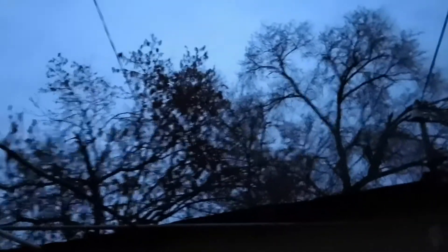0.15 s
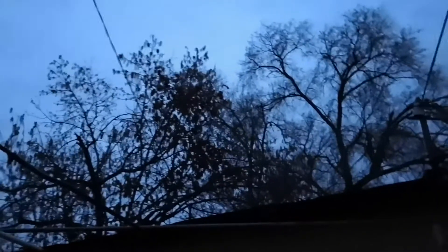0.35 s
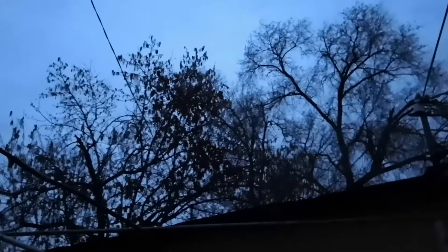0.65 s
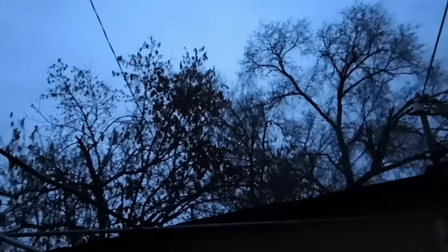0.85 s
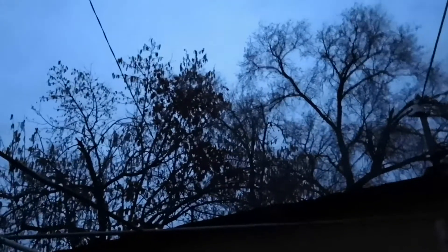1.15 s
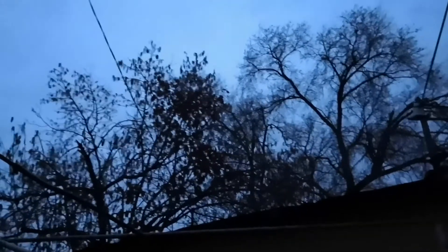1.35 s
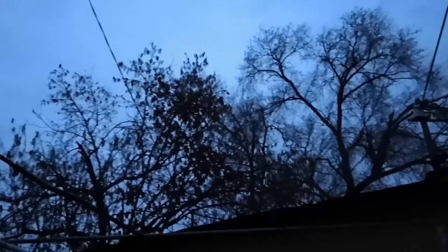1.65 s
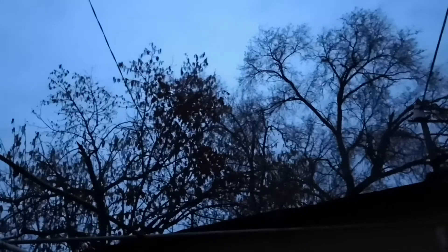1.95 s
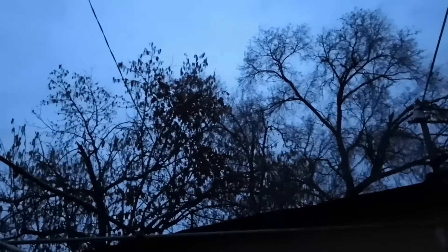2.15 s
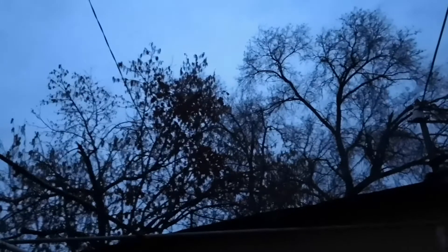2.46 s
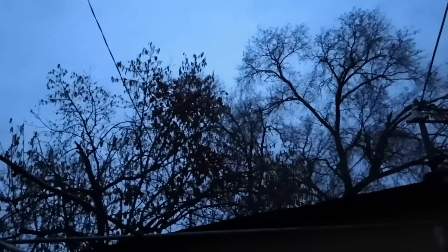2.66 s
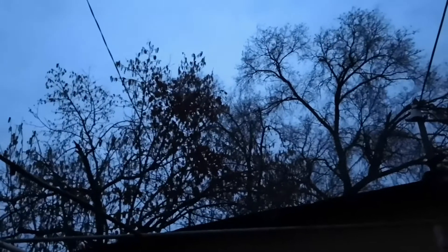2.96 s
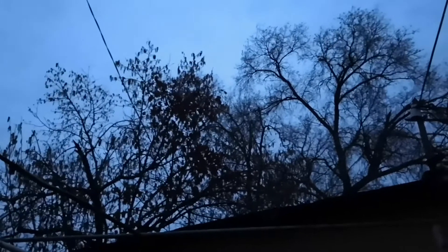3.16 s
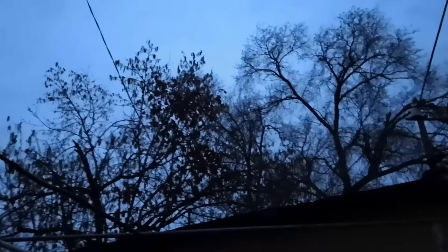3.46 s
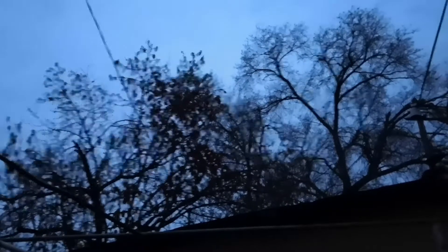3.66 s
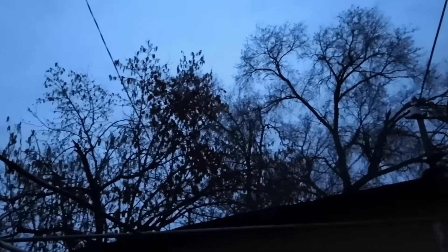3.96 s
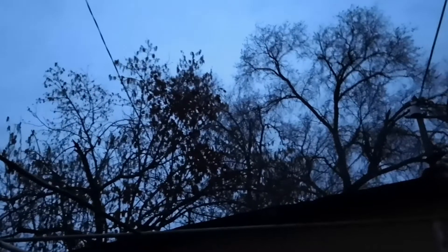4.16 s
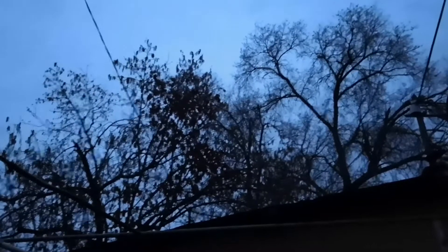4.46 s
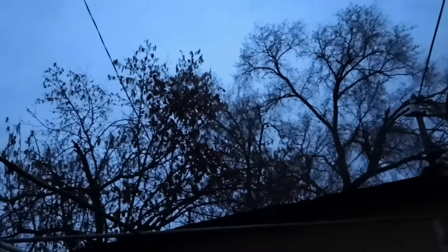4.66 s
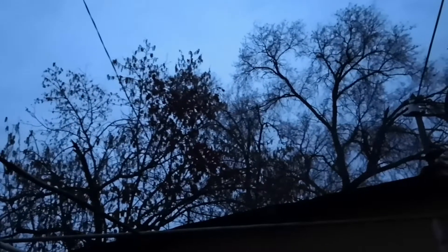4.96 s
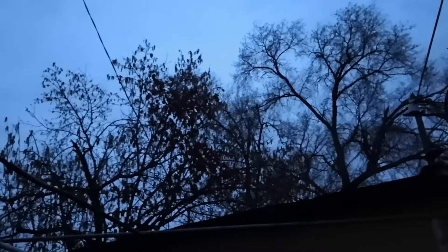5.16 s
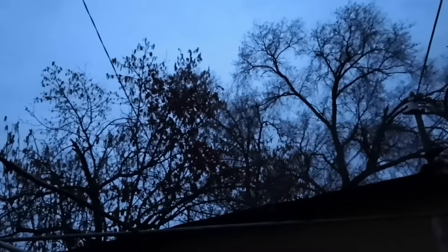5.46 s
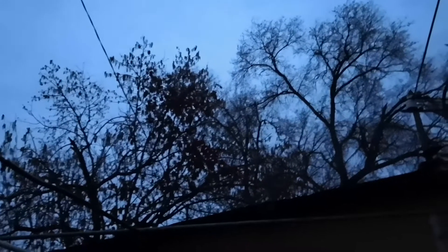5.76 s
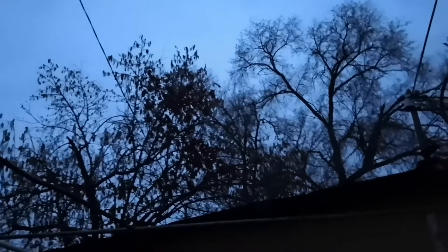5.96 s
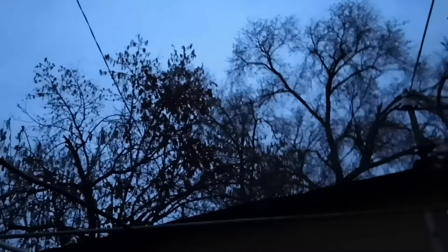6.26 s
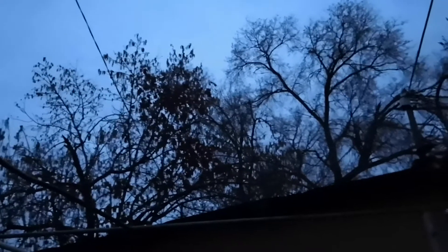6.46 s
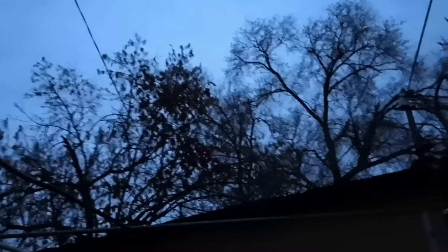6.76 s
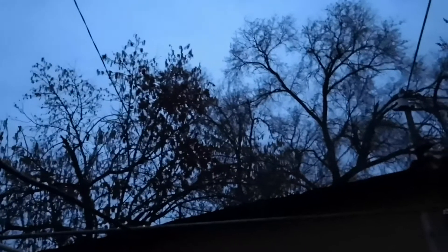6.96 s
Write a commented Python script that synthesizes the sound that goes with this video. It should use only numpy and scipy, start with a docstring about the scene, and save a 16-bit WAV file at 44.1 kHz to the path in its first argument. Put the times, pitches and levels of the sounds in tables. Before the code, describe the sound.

A quiet outdoor scene of about seven seconds, with a low, slightly drifting town hum and faint broadband air. Tiny snap-and-knock ticks recur roughly every 0.6 s. Far birds warble softly at 0.1-0.7 s, then briefly near 3.3, 3.6 and 5.1 s. The blackbird enters at 0.6 s with a falling fluted warble, a short strong whistle at 1.1 s and a higher note at 1.2 s. Thin, high double-toned buzzes follow from 1.5 to 2.4 s. A rising flute glide at 2.7 s leads to reedy squeaks at 3.1 s and a trilled, diving squeal at 3.3 s. After a gap, another rising flute at 4.2 s brings squeaks at 4.6 s and a squeal at 4.8 s. Mellow warbles fill 5.4-5.9 s, louder squeaks come at 6.0-6.2 s, quick flutes at 6.35-6.55 s, then a high see-sawing twitter from 6.7 s to the end. Short diffuse echoes surround the song.

```python
"""Blackbird over a humming town

A blackbird sings fluted, warbling notes, then thin squeaks, squeals, twitters and buzzes: all swept tones.
Most of the song arrives by way of walls and branches, which smear each glide into a short wash of echoes.
Far birds call as softer warbles, and faint ticks pair a noise snap with a hollow knock.
Underneath, shaped noise makes the low hum of the town and its air."""
import sys
import numpy as np
from scipy import signal
from scipy.fft import rfft, irfft
from scipy.io import wavfile
from scipy.ndimage import uniform_filter1d

SR = 44100
rng = np.random.default_rng(int(sys.argv[2]) if len(sys.argv) > 2 else 0)


def log_audio(samples):
    """Write samples as a 16-bit WAV file to the path given in sys.argv[1]."""
    # one column per channel
    frames = np.atleast_2d(samples).T
    # limit to full scale, then quantise
    limited = np.clip(frames, -1, 1)
    pcm = np.round(limited * 32767).astype(np.int16)
    wavfile.write(sys.argv[1], SR, pcm)


N = 313992


def gain_of(db):
    """Decibels to amplitude."""
    return 10 ** (np.asarray(db) / 20)


def evened(x):
    """Scales to rms 1."""
    return x / np.sqrt(np.mean(x ** 2) + 1e-20)


def read(points, hz):
    """Reads a spectrum on a log-frequency axis."""
    f, value = np.transpose(points)
    return np.interp(np.log(hz + 1), np.log(f + 1), value)


def add(mix, s, sound):
    """Mixes a stereo sound in at time s."""
    part = mix[:, max(round(s * SR), 0):][:, :sound.shape[1]]
    part += sound[:, :part.shape[1]]


def wander(length, size):
    """Smooth chance of rms about 1 that changes over about size samples."""
    noise = rng.standard_normal(length + SR)
    return evened(uniform_filter1d(uniform_filter1d(noise, size), size))[:length]


# the town at the two ears: (frequency [Hz], left-right likeness [0 to 1], lead of the left ear [radians])
EAR_LIKENESS = [(30, .998, 0), (100, .985, .03), (250, .85, .35), (430, .55, 1.6), (690, .8, 2.7),
                (1000, .4, 2.1), (1300, .65, .5), (1800, .45, -1.9), (2500, .3, -2), (3200, .5, .6),
                (4000, .35, 3), (10000, .1, 3)]
# side the town leans to: (frequency [Hz], left minus right [dB])
TOWN_SIDE = [(280, 0), (700, 5), (1000, 2.5), (1350, -2.5), (1900, 1), (3000, 0)]


def town(spectrum, patchy_db):
    """Distant noise of rms 1 in drifting patches, alike in both ears mainly in the bass."""
    hz = np.fft.rfftfreq(4096, 1 / SR)
    a, b, c, d, patches = rng.standard_normal((5, N // 1024 + 5, len(hz)))
    # smooth the patches over time, then over pitch
    patches = uniform_filter1d(patches, size=12, axis=0)
    patches = evened(uniform_filter1d(patches, size=3, axis=1))

    at, likeness, lead = np.transpose(EAR_LIKENESS)
    same = np.interp(hz, at, likeness)
    left = a + 1j * b
    shared = left * np.exp(-1j * np.interp(hz, at, lead))
    right = same * shared + np.sqrt(1 - same ** 2) * (c + 1j * d)

    side = gain_of(read(TOWN_SIDE, hz) / 2)
    frames = np.array([left * side, right / side])
    frames *= gain_of(read(spectrum, hz) + patchy_db * patches)
    noise = signal.istft(frames.transpose(0, 2, 1), nperseg=4096, noverlap=3072)[1]
    return evened(noise[:, :N])


# tone of the hum: (frequency [Hz], relative density [dB per Hz])
HUM_SPECTRUM = [(20, -2), (37, -11), (65, -0.5), (113, -1), (140, -4.5), (168, -5), (233, -5.5), (330, -16),
                (380, -10.5), (460, -19.5), (680, -33.5), (1100, -100)]
# slow level changes of the low hum: (time [s], level change [dB])
HUM_LEVEL = [(0, 0), (2.4, -1), (4.1, -1), (4.45, 1), (5.8, 1), (7.12, -.5)]


def town_hum(level_db=-58):
    """Low noise whose level drifts slowly."""
    s, change_db = np.transpose(HUM_LEVEL)
    drift_db = np.interp(np.arange(N) / SR, s, change_db)
    return gain_of(level_db + drift_db) * town(HUM_SPECTRUM, patchy_db=2.5)


# tone of the air: (frequency [Hz], relative density [dB per Hz])
AIR_SPECTRUM = [(300, -46), (520, -14.5), (700, 1), (1050, -5.5), (1300, -5.5), (1480, -7.5), (1850, 1),
                (2500, -4.5), (2800, -5), (4500, -19), (5400, -14.5), (7200, -19.5), (10000, -26.5),
                (15500, -30.5)]


def town_air(level_db=-57):
    """Steady broadband noise above the hum."""
    return gain_of(level_db) * town(AIR_SPECTRUM, patchy_db=3.0)


# faint ticks: (time [s], snap level before its trim [dB], knock level [dB])
TICK_HITS = [(0.1588, -52, -54), (0.7826, -47.5, -52.5), (1.444, -48, -51.5), (1.994, -50.5, -54.5),
             (2.625, -52.5, -52.5), (3.2354, -48, -53), (3.8218, -55.5, -51), (4.446, -53, -54.5),
             (5.0296, -55, -52.5), (5.636, -52, -50), (6.2303, -56, -60)]


def ticks(snap_trim_db=-9, snap_t60=0.083, knock_hz=1550, knock_t60=0.22):
    """Each tick is a brief bright snap over a hollow knock, both of decaying filtered noise."""
    out, t = np.zeros((2, N)), np.arange(SR // 6) / SR
    bright = signal.butter(4, [2000, 9800], "bandpass", fs=SR, output="sos")
    hollow = signal.butter(2, [knock_hz / 1.24, knock_hz * 1.53], "bandpass", fs=SR, output="sos")
    for s, snap_db, knock_db in TICK_HITS:
        snap = evened(signal.sosfilt(bright, rng.standard_normal((2, len(t)))))
        knock = evened(signal.sosfilt(hollow, rng.standard_normal((2, len(t)))))
        tick = snap * gain_of(snap_db + snap_trim_db - 60 * t / snap_t60)
        tick += knock * gain_of(knock_db - 60 * t / knock_t60)
        add(out, s, tick * (1 - np.exp(-t / 0.00024)))  # soften the very first edge
    return out


# direct sound, then distinct echoes from walls: (delay [s], level re the note [dB])
WALL_ECHOES = [(0, -11.5), (.038, -16.5), (.069, -13.5)]
# scatter from branches and roofs: (delay [s], relative level [dB])
SCATTER_SHAPE = [(0, 1), (.03, -5.5), (.07, -1.5), (.095, -9.5), (.15, -15), (.3, -33.5), (.8, -56)]


def garden(note, scatter_db, ahead=0.0733, lead_ms=.36, leaves_hz=6200, leaves_t60=1.0):
    """A note reaches the ears directly, off a few walls, and as scatter that swells and dies."""
    t = np.arange(int(.8 * SR)) / SR
    taps = rng.standard_normal((2, len(t))) * (rng.random((2, len(t))) < 2500 / SR)
    # part of the scatter comes from the bird's own direction and reaches the left ear first
    from_bird = np.roll(taps[0], round(lead_ms * SR / 1000))
    taps[1] = ahead * from_bird + np.sqrt(1 - ahead ** 2) * taps[1]
    # the highest pitches die soonest
    dull = signal.sosfiltfilt(signal.butter(4, leaves_hz, fs=SR, output="sos"), taps)
    taps = dull + (taps - dull) * gain_of(-60 * t / leaves_t60)

    delay, db = np.transpose(SCATTER_SHAPE)
    heard = signal.fftconvolve(note[None], taps * gain_of(np.interp(t, delay, db)), axes=1)
    heard *= gain_of(scatter_db) * np.linalg.norm(note) / np.linalg.norm(heard, axis=1, keepdims=True)
    for s, wall_db in WALL_ECHOES:
        echo = gain_of(wall_db) * note[None]
        add(heard[:1], s, echo)
        add(heard[1:], s + lead_ms / 1000, echo)
    return heard


def syrinx(hz, db, overtones_db, jitter):
    """A nearly pure tone on a slightly unsteady pitch, with its overtones."""
    phase = 2 * np.pi * np.cumsum(hz * (1 + jitter * wander(len(hz), size=130))) / SR
    tone = np.sin(phase)
    for harmonic, overtone_db in enumerate(overtones_db, 2):
        tone = tone + gain_of(overtone_db) * np.sin(harmonic * phase)
    soft_ends = signal.windows.tukey(len(hz), min(300 / len(hz), 1))
    return np.sqrt(2) * gain_of(db) * tone * soft_ends


def swell(u, crest, curve=1.64, onset_db=17, fade_db=4.5):
    """Level in dB along a note (u from 0 to 1): up to the crest, then a rounded fade."""
    crest = np.clip(crest, .05, .97)
    rise = np.maximum(1 - u / crest, 0)
    fall = np.maximum((u - crest) / (1 - crest), 0)
    return -onset_db * rise ** curve - fade_db * fall ** 2


def slur(s, length, first_hz, last_hz, db, crest, first_depth=0, last_depth=0, scoop=0.0376):
    """One note scoops up, glides ever more slowly and droops: start, pitch, level and warble depth."""
    t = np.arange(0, length, 1 / SR)
    u = t / length
    hz = last_hz + (first_hz - last_hz) * (1 - u) ** 1.6
    # scoop and droop are shares of the pitch, over 11.5 and 12 ms
    hz *= 1 - scoop * np.exp(-t / 0.0115) - 0.034 * np.exp((t - length) / 0.012)
    # the warble changes depth just past mid-note
    turned = (1 + np.tanh((u - 0.561) / 0.14)) / 2
    return s, hz, db + swell(u, crest), first_depth + (last_depth - first_depth) * turned


def even_warbles(rows, crest):
    """Notes whose warble keeps one depth."""
    return [slur(*note, crest, depth, depth) for *note, depth in rows]


def warbles(notes, rate_hz, chop, overtones_db, jitter, scatter_db, strain_db=5, strain_hz=120):
    """Pitch swings quickly; a wide swing brings out overtones, and chop mutes the upstrokes."""
    out = np.zeros((2, N))
    for s, hz, db, depth in notes:
        swing = 2 * np.pi * np.cumsum(rate_hz * (1 + 0.0732 * wander(len(hz), size=900))) / SR
        valve = evened(1 - chop * (1 + np.sin(swing)) / 2)
        strain = strain_db * np.tanh(abs(depth) / strain_hz)
        strained_db = [d + strain for d in overtones_db]
        note = valve * syrinx(hz - depth * np.cos(swing), db, strained_db, jitter)
        add(out, s, garden(note, scatter_db))
    return out


# notes of far birds, level before the garden:
# (time [s], length [s], first pitch [Hz], last pitch [Hz], level [dB], warble depth [Hz])
FAR_CALLS = [ (.08, 0.1875, 1360, 1295, -55, 74), (.19, 0.094, 1790, 1850, -58, 55),
             (.43, .32, 2040, 2150, -51.5, 90), (3.27, 0.079, 2310, 2275, -53.5, 20),
             (3.61, .15, 4160, 4330, -71, 60), (5.06, 0.088, 2250, 2325, -58.5, 43)]


def far_birds():
    """Overtone-free warbles that swell until just before they stop, with more scatter than the singer."""
    notes = even_warbles(FAR_CALLS, crest=0.99)
    return warbles(notes, rate_hz=34, chop=.1, overtones_db=[], jitter=0.0112, scatter_db=2.5)


# buzzes, often from both sides of the syrinx at once, level before trim and garden:
# (time [s], length [s], first pitch [Hz], last pitch [Hz], level [dB], sweep depth [Hz])
BUZZ_NOTES = [ (1.49, 0.18, 7400, 6030, -53.5, 624), (1.492, 0.14, 4690, 5300, -52.5, 320),
              (1.685, 0.14, 7070, 6400, -56.5, 716), (1.68, 0.12, 4910, 5230, -57.5, 280),
              (1.915, .17, 4009, 3723, -54, 447), (2.07, 0.36, 3580, 3541, -65.5, 250)]


def buzzes():
    """Trains of quick downstrokes: the pitch swings widely and the upstrokes are muted."""
    notes = even_warbles(BUZZ_NOTES, crest=0.22)
    return gain_of(1.5) * warbles(notes, rate_hz=56, chop=0.71, overtones_db=[-44],
                                  jitter=0.0077, scatter_db=-2.0)


TRILL_HZ = 113  # swings a second in the high strokes
DIVE_TO_HZ = 3800


def stroke(s, length, from_hz, top_hz, to_hz, db, trill_depth_hz, start_db, end_db):
    """One high stroke: it snaps to its pitch, holds, then moves to its last; the trill dies at the end."""
    snap_s, dive_s, attack_s = .004, .021, 0.0048
    t = np.arange(0, length, 1 / SR)
    dive = np.maximum(1 - (length - t) / dive_s, 0)
    hz = top_hz + (from_hz - top_hz) * np.exp(-t / snap_s) + (to_hz - top_hz) * dive ** 1.1
    level_db = db + start_db * np.exp(-t / attack_s) + end_db * dive
    return s, hz, level_db, trill_depth_hz * (1 - dive) ** 2


# closing see-saws, level before trim and garden: (time [s], hook pitch [Hz], held pitch [Hz], level [dB])
SEE_SAWS = [(6.671, 6240, 5760, -43), (6.845, 6630, 5685, -44), (7.027, 6650, 5510, -50)]


def twitter_strokes():
    """Each see-saw is a diving hook and an upstroke that is held."""
    for s, hook_hz, held_hz, db in SEE_SAWS:
        yield stroke(s, .036, .83 * hook_hz, hook_hz, DIVE_TO_HZ, db,
                     trill_depth_hz=70, start_db=-11, end_db=-5)
        yield stroke(s + .058, .054, 3300, held_hz, held_hz, db - 4.5,
                     trill_depth_hz=0, start_db=-11, end_db=-5)


def twitter():
    """The see-saw strokes as nearly pure tones."""
    return gain_of(1.1) * warbles(twitter_strokes(), TRILL_HZ, chop=0, overtones_db=[-40],
                                  jitter=0.0023, scatter_db=-2.5)


# high trilled squeals, level before trim and garden:
# (time [s], top pitch [Hz], bottom of the dive [Hz], level [dB])
SQUEAL_DIVES = [(3.284, 7080, 4070, -46), (4.792, 7160, 4360, -42)]


def squeal_strokes(squeal_s=.05, rebound_s=.04):
    """Each squeal swells into its dive, rebounds in a plain arch and dives again."""
    for s, top_hz, bottom_hz, db in SQUEAL_DIVES:
        yield stroke(s, squeal_s, top_hz, top_hz, bottom_hz, db,
                     trill_depth_hz=585, start_db=0, end_db=12.5)
        yield stroke(s + squeal_s, rebound_s, bottom_hz, 5980, DIVE_TO_HZ, db + 5.5,
                     trill_depth_hz=0, start_db=-11.0, end_db=2)


def squeals():
    """The diving strokes with a fast, wide trill."""
    return gain_of(1.0) * warbles(squeal_strokes(), TRILL_HZ, chop=0, overtones_db=[-33],
                                  jitter=0.0087, scatter_db=-2.5)


# reedy squeaks, level before the garden: (time [s], length [s], first pitch [Hz], last pitch [Hz],
# level [dB], first second-harmonic level [dB re the tone], last second-harmonic level [dB re the tone])
SQUEAK_NOTES = [ (3.087, .09, 3290, 2920, -52.5, 5.5, -13), (3.148, 0.0645, 2184, 1961, -43.5, -6, -25),
                (3.186, 0.0443, 2704, 2670, -43.5, -28, -13), (4.588, 0.097, 3337, 2950, -50, 7, -10),
                (4.653, 0.0674, 2225, 1919, -45, -4, -23), (4.685, 0.0507, 2814, 2743, -41.5, -13, -35),
                (5.997, 0.15, 2587, 3028, -42, -21.5, -11), (6.118, 0.087, 3184, 3235, -38.5, -20, -33)]


def squeaks(third_db=-11):
    """Pressed notes that arch in pitch, with second and third harmonics that change along the note."""
    out = np.zeros((2, N))
    for *note, first_db, last_db in SQUEAK_NOTES:
        s, hz, db, _ = slur(*note, crest=0.3, scoop=0.1205)
        second_db = np.linspace(first_db, last_db, len(hz))
        squeak = syrinx(hz, db, [second_db, second_db + third_db], jitter=0.014)
        add(out, s, garden(squeak, scatter_db=0))
    return out


# fluted notes, level before trim and garden: (time [s], length [s], first pitch [Hz], last pitch [Hz],
# level [dB], crest [share of length], first warble depth [Hz], last warble depth [Hz])
FLUTE_NOTES = [ (0.618, 0.34, 2709, 2117, -39, 0.71, 315, 10),
               (1.078, 0.071, 1890, 1857, -34, 0.18, 13, 58), (1.216, .17, 2702, 2930, -45.5, 0.37, 58, 84),
               (1.859, 0.043, 1950, 2000, -43, 0.42, 60, 96), (2.715, 0.24, 1804, 2502, -35.5, 1, 190, 2),
               (4.2, .265, 1880, 2532, -34.5, 0.8, 224, 2.5),
               (5.394, .135, 2263, 2390, -36.5, 0.46, 8.1, 147),
               (5.512, 0.14, 2356, 2284, -37, 0.13, 303, 360),
               (5.744, 0.21, 2033, 2100, -40.5, 0.16, 10, 30),
               (5.817, 0.11, 2367, 2454, -32.5, 0.32, 3.9, 3),
               (6.341, 0.033, 2576, 2503, -41.5, 0.69, 3, 3.5),
               (6.365, 0.072, 2020, 2149, -36.5, 0.64, 5, 120),
               (6.434, 0.14, 2392, 2060, -35, 0.49, 324, 8)]


def flutes():
    """Gliding, nearly pure notes whose warble deepens or settles."""
    notes = [slur(*row) for row in FLUTE_NOTES]
    return gain_of(1.5) * warbles(notes, rate_hz=45, chop=0.16, overtones_db=[-36, -52, -50],
                                  jitter=0.0058, scatter_db=-3.0)


# the song leans to one side or the other by pitch: (frequency [Hz], left minus right [dB])
SONG_LEAN = [(1300, -1), (1860, -3), (2100, -6), (2300, 5.5), (2470, 3), (2750, 4), (3200, 1.5),
             (5000, -3.5), (8000, 3.5)]


def blackbird():
    """All kinds of note, leaning left or right by pitch."""
    song = flutes() + squeaks() + squeals() + twitter() + buzzes()
    side_db = read(SONG_LEAN, np.fft.rfftfreq(2 * N, 1 / SR))
    ears = gain_of(side_db * np.array([[.5], [-.5]]))
    ears /= np.sqrt((ears ** 2).mean(0))  # keep the mean power of the two gains at 1
    return irfft(rfft(song, 2 * N) * ears, 2 * N)[:, :N]


def scene():
    """The town, the ticks, the far birds and the singer."""
    return town_hum() + town_air() + ticks() + far_birds() + blackbird()


def record(dry, open_db=-37, knee_db=3, max_lift_db=9, edge_hz=15720):
    """A gentle expander lifts loud notes and the background under them; then a treble limit."""
    power = uniform_filter1d((dry ** 2).mean(0), size=1500)
    power_db = 10 * np.log10(abs(power) + 1e-12)
    opened = 1 / (1 + 2 * np.exp((open_db - power_db) / knee_db))
    lift_db = max_lift_db * uniform_filter1d(opened, size=1500)
    edge = signal.firwin(1023, edge_hz, window=("kaiser", 9), fs=SR)
    return signal.oaconvolve(dry * gain_of(lift_db), edge[None], "same")


dry = scene()
out = record(dry)
log_audio(out)
```